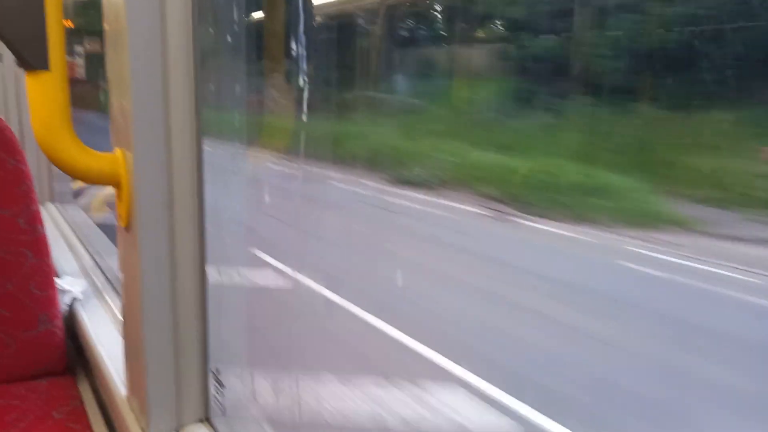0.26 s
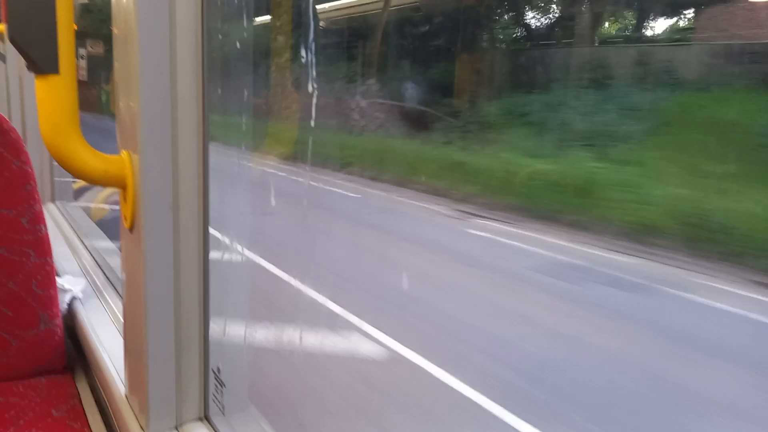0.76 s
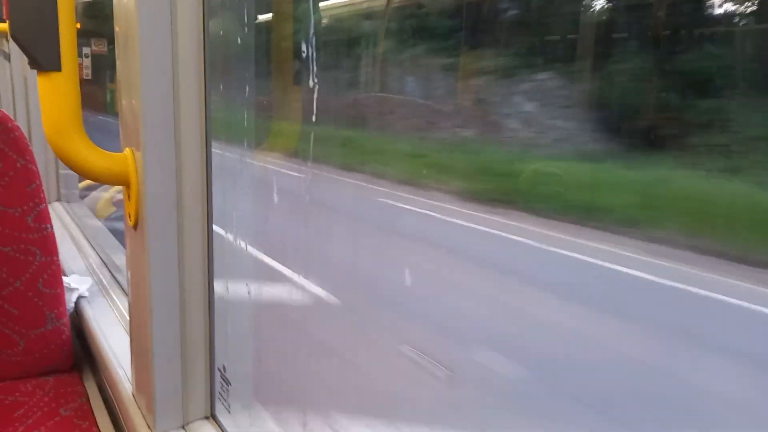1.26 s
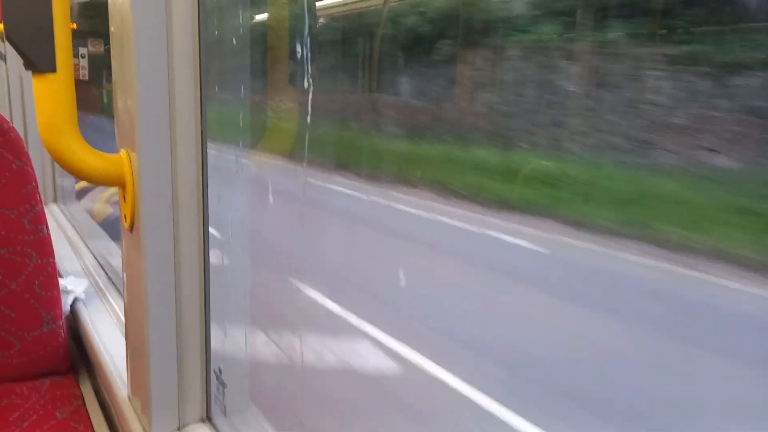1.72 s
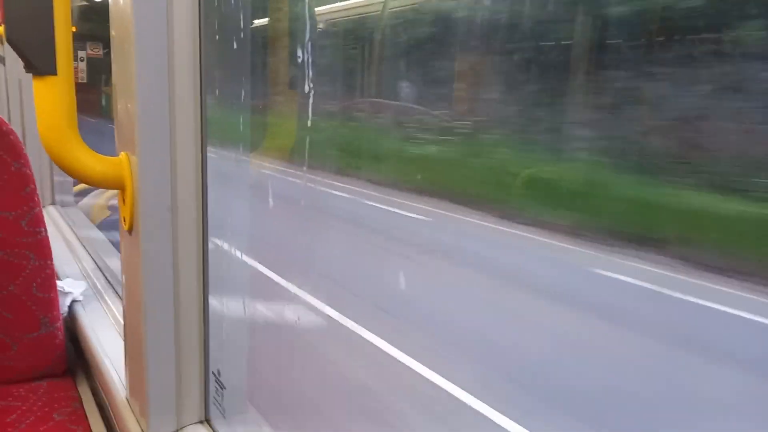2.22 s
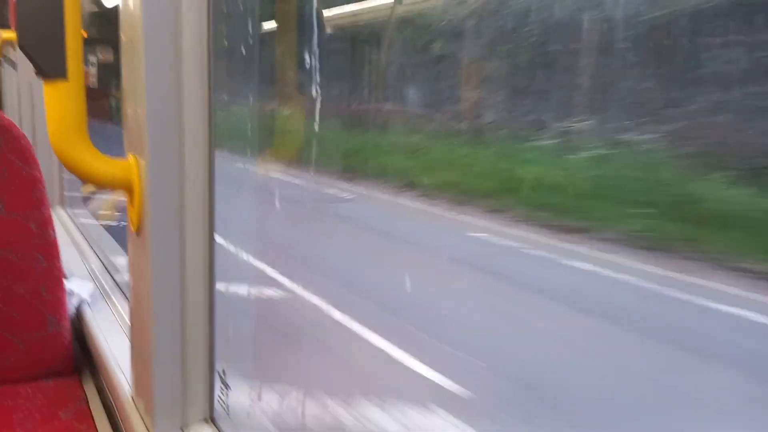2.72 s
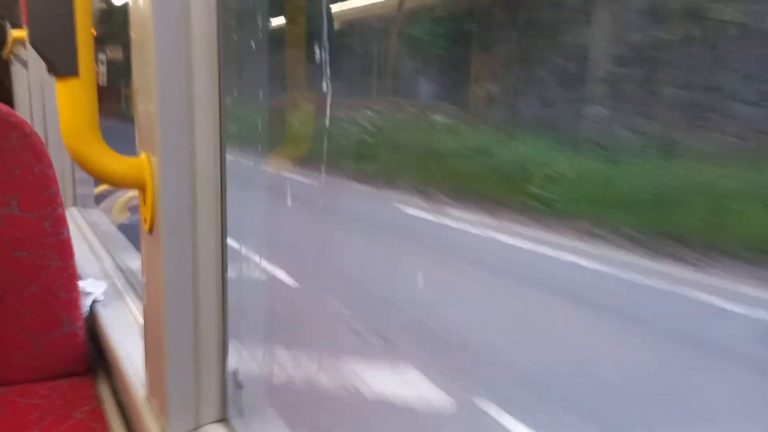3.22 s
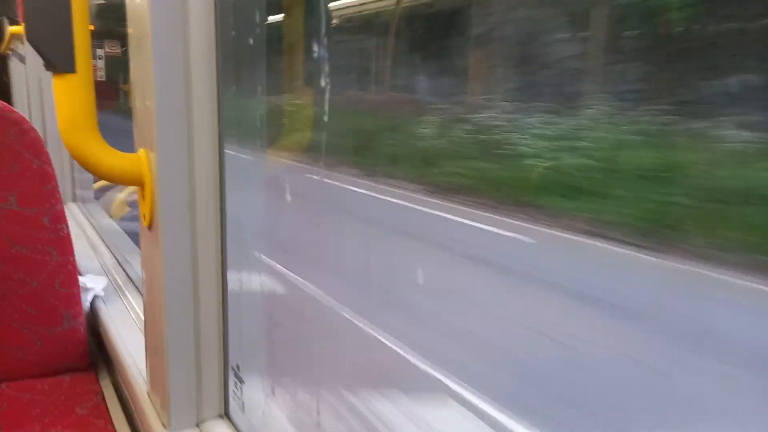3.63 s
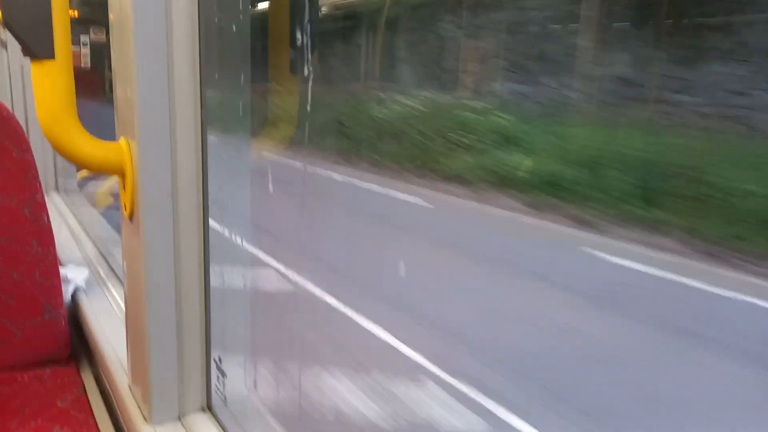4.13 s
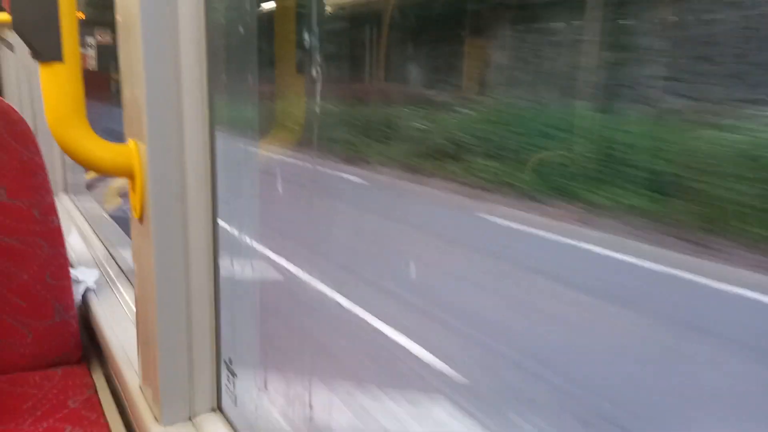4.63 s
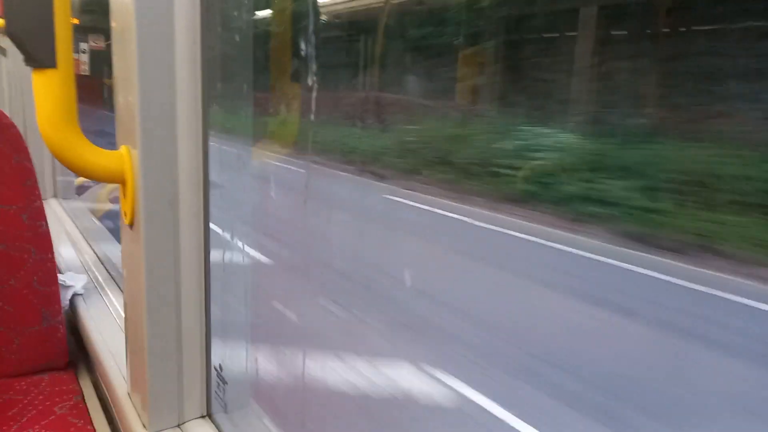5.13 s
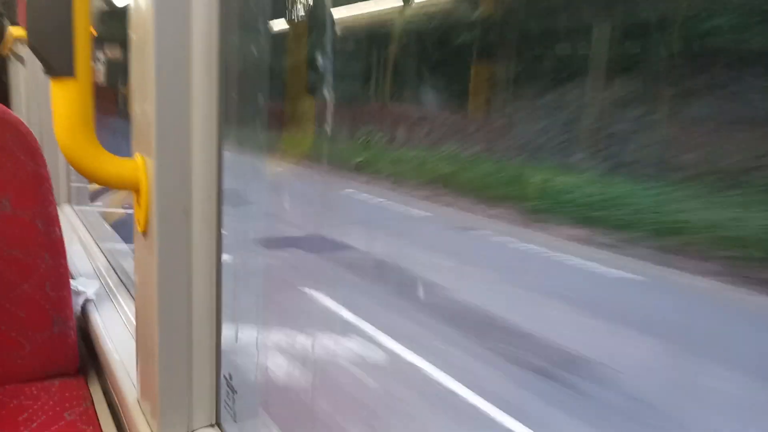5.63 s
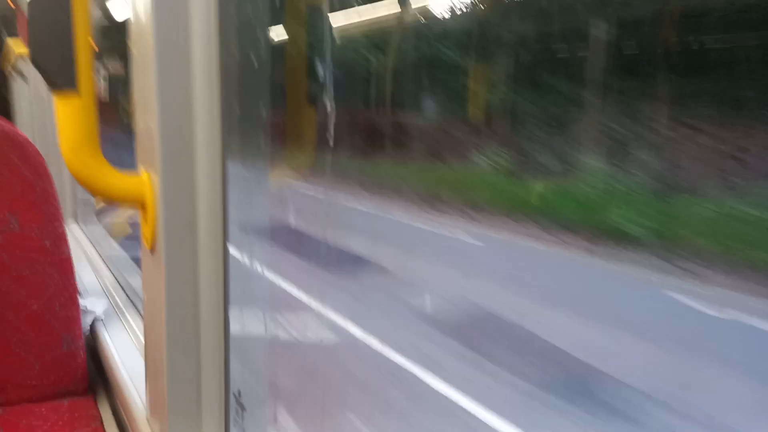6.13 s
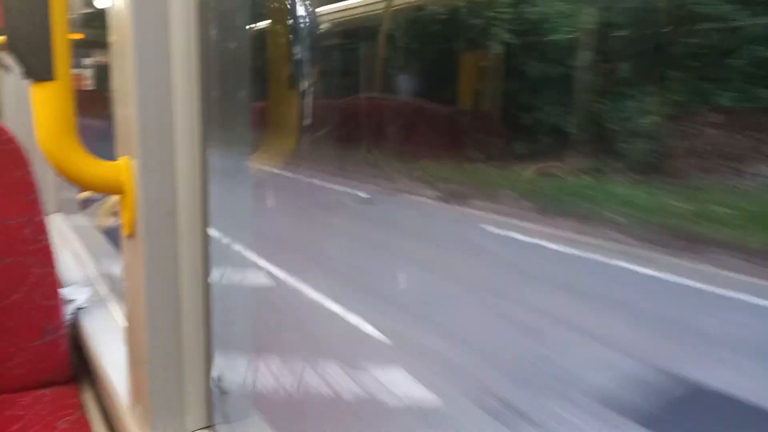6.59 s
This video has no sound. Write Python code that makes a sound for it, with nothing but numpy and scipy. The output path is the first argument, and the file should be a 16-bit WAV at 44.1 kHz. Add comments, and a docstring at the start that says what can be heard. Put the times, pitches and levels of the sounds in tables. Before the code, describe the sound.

A diesel bus is heard from a window seat inside, with deep road rumble, tyre roar and a booming engine drone throughout. Window and seat trim chatters lightly with each jolt, along with faint squeaks and a thin whine. Over the first two seconds the engine rises gently in pitch, trailed by a very faint high turbo whistle. A sharper knock comes at about 2.1 seconds. The engine then cruises steadily until about 5 seconds, while small clicks and knocks from loose fittings grow more frequent from 3.5 seconds. Between 5 and 5.7 seconds it changes up, dropping to low revs, and the whistle dies away. Two low bumps boom through the floor at about 5.7 and 6 seconds. The tyres swish briefly over patched asphalt from around 5.9 to 6.5 seconds, and the bus rumbles on with its panels humming until nearly 7 seconds.

```python
"""A window seat in a diesel bus on a country road. From the start the road rumbles through the body,
the tyres roar, and every jolt sets the trim chattering, among stray knocks and squeaks. Over two
seconds the four-cylinder engine pulls up, its turbo whistle trailing behind, then cruises, booming
in the cabin's air resonances. After five seconds it changes up to low revs and the turbo dies away;
last, bumps boom through the floor and the tyres swish over patched asphalt."""
import sys
import numpy as np
from scipy import signal
from scipy.fft import rfft, irfft
from scipy.io import wavfile
from scipy.ndimage import uniform_filter1d, minimum_filter1d

SR = 44100
rng = np.random.default_rng(int(sys.argv[2]) if len(sys.argv) > 2 else 0)


def put_to_file(sound):
    """Save the sound as 16-bit audio at rate SR, in the file named by the first command-line argument."""
    columns = np.atleast_2d(sound).T  # one column per channel
    safe = np.clip(columns, -1, 1)
    whole_steps = np.round(safe * 32767)
    wavfile.write(sys.argv[1], SR, whole_steps.astype(np.int16))


N = 302526
TIME = np.arange(N) / SR
BIN_HZ = np.fft.rfftfreq(N, 1 / SR)

# stereo image of the cabin: (frequency [Hz], left-right correlation [-1 to 1])
EAR_CORRELATION = [(60, 0.98), (210, 0.98), (350, 0.92), (500, 0.12), (770, 0.096), (1170, -0.31),
                   (1800, 0.088), (16000, -0.14)]
# lean of that image: (frequency [Hz], left minus right [dB])
EAR_BALANCE = [(50, -.5), (85, 1.5), (140, 0), (300, -2), (600, -4), (1100, -1.5), (2150, 7), (2950, 0),
               (4500, 0), (8000, -1), (16000, -3)]

# tone colours of the noise beds: (frequency [Hz], relative level [dB])
TRIM_SPECTRUM = [(1500, -22), (3000, -5), (4700, 6), (5450, 3), (5900, -8.5), (7300, 3.5), (8700, -6.5),
                 (12000, -6), (16000, -13.5)]
GRIT_SPECTRUM = [(500, -13), (1000, 3.5), (1400, -2), (2000, -4), (2600, -1.5), (3300, -2), (4200, -8),
                 (6500, -11), (9000, -23), (16000, -36.5)]
TYRE_SPECTRUM = [(250, -14.5), (470, -1.5), (550, 1.5), (720, -1), (1000, -2), (1400, -6), (1900, -13),
                 (2350, -15), (2700, -18), (3600, -22), (5300, -27.5), (7400, -33.5), (8700, -47.5),
                 (16000, -57)]
DRONE_SPECTRUM = [(100, -33), (180, -12), (215, -2), (245, 4.5), (285, -5), (322, 0), (350, -7),
                  (375, -11.5), (420, -13.5), (470, -28.5), (800, -62)]
FLOOR_SPECTRUM = [(20, -34), (40, -24), (52, -16.5), (64, 0), (76, 2), (100, -0.5), (135, 0.5), (165, -0.5),
                  (200, -10), (300, -33), (600, -71)]

# resonances: (frequency [Hz], width [Hz], lift [dB])
METAL_MODES = [(3600, 110, 8), (4700, 90, 2.5), (5250, 79, 1.5), (6230, 170, 8), (6900, 130, 5.5),
               (9300, 120, 5)]  # thin metal trim
WHEEL_ARCH_MODES = [(1900, 110, 7), (2160, 80, 3), (3230, 34, 6.5)]
HOLLOW_MODES = [(544.4, 24, 4), (685, 130, 2.5), (1830, 260, 3), (2284, 200, 3.5), (3595, 110, 4.5),
                (5480, 78, 4)]  # the hollow of the cabin
PANEL_MODES = [(95, 11, 7.5), (116.2, 15, 6), (170.8, 15, 4.5), (245.5, 17.3, 9.5), (331, 8, 4.5)]  # cabin air and side panels, swept by the engine orders
AIR_MODES = [(58.7, 11, 14.5), (75.4, 4, 12.5), (100, 2.6, 19.5), (126.3, 7.8, 14)]  # air along the cabin, swept by the firing note and its octave

# trim rubs: (midpoint [s], length [s], pitch [Hz], level [dB], octave above tone [dB])
TRIM_SQUEAKS = [(.33, .17, 5500, -59, -22), (.442, .14, 4980, -55, -14), (.58, .2, 5240, -49, -13),
                (.87, .22, 5270, -51.5, -10), (2.22, .3, 5426, -55, -19), (2.8, .14, 5446, -56, -22),
                (3.98, .17, 4690, -57, -5), (4.419, .2, 4930, -57, -8), (4.89, .14, 5126, -55, -6),
                (5.139, .07, 4678, -59, 3)]
# loose fittings knock: (time [s], level [dB], ring [Hz], share of dry crack [0-1])
FITTING_KNOCKS = [(.495, -38.5, 5170, 0.07), (2.119, -44, 5450, .1), (2.131, -21.5, 650.5, 0.04),
                  (3.152, -47, 4900, 0.4), (3.538, -35, 4300, 0.5), (3.542, -34.5, 1100, 0.06),
                  (3.580, -49, 6230, 0.2), (3.924, -41, 4400, 0.32), (4.0382, -29.5, 3805, 0.7),
                  (4.557, -37, 6600, 0.4), (4.754, -34.5, 6890, 0.5), (5.384, -39, 7020, .5),
                  (5.597, -34, 4300, .6), (5.696, -42, 9500, .7), (5.763, -37, 6800, .4),
                  (5.955, -32, 3280, .02), (6.205, -42, 4640, .15), (6.388, -37, 6850, 0.46),
                  (6.67, -38, 4765, 0.5)]
# uneven road jolts the body: (peak time [s], strength [0-1])
ROAD_JOLTS = [(.15, 0.55), (.46, 0.66), (.83, 0.35), (1.2, 0.06), (1.31, 0.2), (1.77, 0.5), (2.3, 0.3),
              (2.78, 0.4), (3.06, 0.6), (3.15, 0.5), (3.56, 0.8), (3.94, 0.8), (4.33, 0.61), (4.55, 0.3),
              (4.76, .6), (4.94, 0.5), (5.4, .65), (5.61, 0.64), (5.79, .6), (6.23, 0.4), (6.31, 0.28),
              (6.4, 1), (6.49, 0.56)]
# coarseness of the asphalt: (time [s], tyre roar lift [dB])
COARSENESS = [(0, 0.7), (1.1, 0.5), (1.6, 0.1), (4.0, 0.2), (4.35, 1.25), (5.1, 0), (5.85, 4.5), (6.07, 3),
              (6.27, 5.5), (6.5, 2), (6.7, 0), (6.86, 1)]
# the tyres cross asphalt patches: (peak time [s], level [dB], rise [s], fall [s])
ASPHALT_PATCHES = [(5.88, -33.5, 0.061, 0.06), (5.962, -32.5, 0.031, 0.078), (6.25, -37, 0.056, 0.074),
                   (6.44, -41, .06, 0.08)]
# a side panel hums up: (peak time [s], level [dB], pitch [Hz], half length [s])
PANEL_HUMS = [(.87, -22.5, 252, .38), (5.277, -22, 324.2, 0.22), (6.707, -21.5, 314, .25)]
# the side panels' drone: (time [s], level [dB])
DRONE_LEVEL = [(0, -19), (.8, -20.5), (1.6, -25), (3.5, -23.5), (4.2, -22), (4.9, -23), (5.6, -20.5),
               (6.2, -18), (6.86, -20)]
# the wheels hit bumps: (time [s], level [dB], pitch [Hz], rise [s])
WHEEL_BUMPS = [(0.47, -14, 101.2, 0.047), (4.311, -13.5, 79.2, 0.062), (5.51, -19, 97, 0.021),
               (5.66, -6, 82.84, 0.043), (6.018, -9.5, 80, 0.036)]

# the engine pulls up, cruises and changes up a gear: (time [s], firing rate [Hz])
FIRING_RATE = [(0, 50.73), (.25, 51.08), (.8, 56.16), (1.12, 57.14), (1.45, 60.23), (1.7, 63.03),
               (2.0, 61.9), (2.4, 63.34), (3.5, 63.02), (5.0, 63.53), (5.3, 60.5), (5.5, 56.7),
               (5.68, 41.6), (6.1, 39.43), (6.4, 35.98), (6.86, 37.57)]
# how hard it pulls, easing off for the gear change: (time [s], load [dB])
ENGINE_LOAD = [(0, 1), (.6, 0), (1.8, 0.5), (2.5, -1.5), (4.9, -3), (5.3, 0.5), (5.58, -6.5), (5.85, -0.5),
               (6.86, 1.5)]
# throb of uneven cylinders: (order [multiple of the cycle rate], relative level [dB])
THROB_ORDERS = [(5, -24), (6, -9.5), (7, -4.5), (9, -4.5), (10, -12.5), (11, -2.5), (12, -11), (13, -8),
                (14, -13), (15, -12), (16, -24.5), (17, -13), (18, -11), (19, -31), (20, -20), (21, -12),
                (22, -8.5), (23, -27), (24, -17.5), (25, -31.5), (26, -20.5), (27, -25.5)]


def gain_of(db):
    """Decibels to amplitude."""
    return 10 ** (np.asarray(db) / 20)


def unit_rms(x):
    """Scales to rms 1."""
    return x / np.sqrt(np.mean(x ** 2) + 1e-20)


def curve(points):
    """An automation curve through (time, value) points."""
    return np.interp(TIME, *np.transpose(points))


def eq_curve(points):
    """A curve through (frequency, value) points, on a log-frequency axis."""
    hz, value = np.transpose(points)
    return np.interp(np.log(BIN_HZ + 1), np.log(hz + 1), value)


def lift(modes, hz):
    """The dB that a set of resonances adds at each frequency."""
    return sum(db / (1 + (2 * (hz - centre) / width) ** 2) for centre, width, db in modes)


def panned(db):
    """Stereo gains for a left-minus-right level."""
    return gain_of(np.array([[db], [-db]]) / 2)


def add(mix, s, sound):
    """Mixes a sound in at time s."""
    part = mix[:, round(s * SR):][:, :sound.shape[1]]
    part += sound[:, :part.shape[1]]


def swell(s, rise_s, fall_s):
    """A rounded hump of height 1 at time s."""
    return np.exp(-((TIME - s) / np.where(TIME < s, rise_s, fall_s)) ** 2)


def noise():
    """Two channels of white noise."""
    return rng.standard_normal((2, N))


def wander(hz):
    """Random drift of rms 1, up to the given rate."""
    coarse = TIME[::32]
    rates = np.fft.rfftfreq(len(coarse), coarse[1])
    spectrum = rfft(rng.standard_normal(len(coarse))) / (1 + (rates / hz) ** 4)
    return np.interp(TIME, coarse, unit_rms(irfft(spectrum, len(coarse))))


def fuzzy_tone(hz, width_hz):
    """A narrow band of noise, rms 1, that follows a pitch."""
    phase = 2 * np.pi * np.cumsum(hz * np.ones(N)) / SR
    return wander(width_hz) * np.cos(phase) + wander(width_hz) * np.sin(phase)


def burst(t60):
    """A dying puff of stereo noise."""
    t = TIME[:8192]
    return rng.standard_normal((2, len(t))) * gain_of(-60 * t / t60)


def contacts(per_s, spread_db, t60):
    """A grainy texture of tiny impacts of uneven size, each dying quickly."""
    hits = rng.random(N) < per_s / SR
    taps = hits * gain_of(spread_db * np.minimum(rng.exponential(1, N), 3))
    decay = gain_of(-60 * TIME[:4096] / t60)
    power = signal.oaconvolve(taps ** 2, decay ** 2)[:N]
    return noise() * np.sqrt(np.maximum(power, 0))


def cabin(drive, spectrum, modes=(), ripple_db=2.7, ripple_hz=28):
    """Colours a texture, at rms 1; bass reaches both ears alike, treble comes from all around."""
    left, other = rfft(drive)
    alike = eq_curve(EAR_CORRELATION)
    right = alike * left + np.sqrt(1 - alike ** 2) * other
    # reflections from the glass leave a fine, steady ripple above the bass
    ripple = np.interp(BIN_HZ / ripple_hz, np.arange(4096), rng.uniform(-1, 1, 4096)) * (BIN_HZ > 800)
    colour_db = eq_curve(spectrum) + lift(modes, BIN_HZ) + ripple_db * ripple
    side_db = np.outer([1, -1], eq_curve(EAR_BALANCE)) / 2
    return unit_rms(irfft(np.array([left, right]) * gain_of(colour_db + side_db), N))


def jolting(rise_s=.021, fall_s=.09):
    """How hard the road shakes floor, tyres and trim together: 0 at rest to about 1."""
    return sum(strength * swell(s, rise_s, fall_s) for s, strength in ROAD_JOLTS)


def whine(hz=1015, width_hz=10, start_db=-42, end_db=-47):
    """A thin wavering whine, as of axle gears, reaching the ears in opposite phase."""
    level = gain_of(np.linspace(start_db, end_db, N))
    return level * fuzzy_tone(hz, width_hz) * np.array([[1], [-.8]])


def turbo(base_hz=13750, base_firing_hz=50.5, hz_per_hz=235, lag_s=.08, width_hz=200, level_db=-62):
    """An airy, very high whistle that trails the revs and grows with the load."""
    inertia = np.exp(-1 / (lag_s * SR))
    rise_hz = signal.lfilter([1 - inertia], [1, -inertia], curve(FIRING_RATE) - base_firing_hz)
    hz = base_hz + hz_per_hz * rise_hz
    boost = np.interp(base_firing_hz + rise_hz, [45, 52], [0, 1])  # off boost at low revs
    whistle = np.array([fuzzy_tone(hz, width_hz), fuzzy_tone(hz, width_hz)])
    return gain_of(level_db + .8 * curve(ENGINE_LOAD)) * boost * whistle


def squeaks(waver=.01, scratch_hz=120):
    """Scratchy stick-slip in the trim: a wavering tone and its octave, chopped by the changing grip."""
    out = np.zeros((2, N))
    bend = wander(40)
    grip = np.array([wander(scratch_hz), wander(scratch_hz)])
    for s, length, hz, db, octave_db in TRIM_SQUEAKS:
        span = abs(TIME - s) < length / 2
        phase = 2 * np.pi * np.cumsum(hz * (1 + waver * bend[span])) / SR
        tone = np.sin(phase) + gain_of(octave_db) * np.sin(2 * phase)
        out[:, span] += gain_of(db) * tone * signal.windows.tukey(len(tone), .5) * grip[:, span]
    return out


def knocks(ring_t60=.11, snap=2.6, snap_t60=.0045, relative_width=.35):
    """Each loose fitting snaps, then rings in one broad resonance over a dry crack."""
    out = np.zeros((2, N))
    for s, db, hz, dryness in FITTING_KNOCKS:
        crack = burst(ring_t60 * (1 - dryness)) + snap * burst(snap_t60)  # drier is shorter
        edges_hz = hz * np.exp([-relative_width / 2, relative_width / 2])
        band = signal.butter(2, edges_hz, "band", fs=SR)
        makeup = np.sqrt(SR / 2 / (relative_width * hz))
        ring = makeup * signal.lfilter(*band, crack)
        add(out, s, gain_of(db) * ((1 - dryness) * ring + dryness * crack))
    return out


def trim_chatter(jolt, level_db=-55.5, jolt_db=9, per_coarseness=2.07, clump_db=2):
    """Window frames and seat trim chatter in clumps of tiny contacts, louder on jolts and coarse road."""
    clumps = contacts(per_s=470, spread_db=-1, t60=.032) * gain_of(clump_db * np.tanh(wander(15)))
    level = gain_of(level_db + jolt_db * jolt + per_coarseness * curve(COARSENESS))
    return level * cabin(clumps, TRIM_SPECTRUM, METAL_MODES)


def tyre_swish(steady_db=-50):
    """Grit hisses faintly under the tyres, swelling on each patch of asphalt."""
    patches = sum(gain_of(db) * swell(s, rise, fall) for s, db, rise, fall in ASPHALT_PATCHES)
    grit = cabin(contacts(per_s=770, spread_db=1, t60=.018), GRIT_SPECTRUM, WHEEL_ARCH_MODES)
    return (gain_of(steady_db) + patches) * grit


def tyre_roar(cycle, jolt, level_db=-31, jolt_db=2.5, flutter_db=1.3, pulse_depth=.071):
    """The roar rides on coarse road and jolts, pulsing faintly with the engine cycle."""
    pulsing = 1 + pulse_depth * np.cos(cycle)
    level = gain_of(level_db + curve(COARSENESS) + jolt_db * jolt + flutter_db * np.tanh(wander(22)))
    return level * pulsing * cabin(noise(), TYRE_SPECTRUM, HOLLOW_MODES)


def panel_hums(width_hz=7):
    """Each hum blooms and fades in one narrow panel resonance."""
    return panned(-2) * sum(gain_of(db) * swell(s, half, half) * fuzzy_tone(hz, width_hz)
                            for s, db, hz, half in PANEL_HUMS)


def floor_bumps():
    """Each bump swells and dies in one low resonance of the floor."""
    out = np.zeros((2, N))
    t = TIME[:SR]
    for s, db, hz, rise in WHEEL_BUMPS:
        envelope = (t / rise * np.exp(1 - t / rise)) ** 2
        tone = np.sqrt(2) * np.sin(2 * np.pi * hz * t)
        add(out, s, gain_of(db) * envelope * tone[None])
    return out


def body_rumble(jolt, level_db=-18, jolt_db=2, per_coarseness=.33, drone_lift_db=.5):
    """The road shakes the floor, harder at each jolt, and sets the side panels droning."""
    floor_db = level_db + jolt_db * jolt + per_coarseness * curve(COARSENESS)
    floor = gain_of(floor_db) * cabin(noise(), FLOOR_SPECTRUM)
    drone = gain_of(curve(DRONE_LEVEL) + drone_lift_db) * cabin(noise(), DRONE_SPECTRUM)
    return floor + drone


def engine_cycle(jitter=.00099):
    """Phase of the four-stroke cycle: four firings each time round, slightly unsteady."""
    firing_hz = curve(FIRING_RATE) * (1 + jitter * wander(13))
    return 2 * np.pi * np.cumsum(firing_hz) / SR / 4


def engine(cycle, note_db=-30.5, octave_db=-28, throb_db=-21, smear=.3, scatter=.77):
    """The firing note and its octave boom in the cabin's resonances; one stronger cylinder throbs."""
    def partial(order, flutter):
        """One order; the body smears each kick, more so the farther the order lies from the octave."""
        lag = smear * (order - 8) ** 2 + scatter * rng.standard_normal()
        return np.sqrt(2) * (1 + flutter * wander(4.3)) * np.cos(order * cycle - lag)

    firing_hz = curve(FIRING_RATE)
    low_cut_db = 67 * np.minimum(np.log2(firing_hz / 50), 0)  # 67 dB an octave below 50 Hz
    note = gain_of(note_db + lift(AIR_MODES, firing_hz) + low_cut_db) * partial(4, flutter=.056)
    octave = gain_of(octave_db + lift(AIR_MODES, 2 * firing_hz)) * partial(8, flutter=.056)
    throb = sum(gain_of(db + lift(PANEL_MODES, order * firing_hz / 4)) * partial(order, flutter=.1)
                for order, db in THROB_ORDERS)
    lugging_db = np.interp(firing_hz, [42, 50], [-3, 0])  # the throb softens at low revs
    throb *= gain_of(throb_db + curve(ENGINE_LOAD) + lugging_db)
    return note + (octave + throb) * panned(-2)


def scene():
    """The mix at the seat: road bed, drivetrain and rattles."""
    cycle, jolt = engine_cycle(), jolting()
    road = body_rumble(jolt) + panel_hums() + floor_bumps() + tyre_roar(cycle, jolt) + tyre_swish()
    drivetrain = engine(cycle) + turbo() + whine()
    rattles = trim_chatter(jolt) + knocks() + squeaks()
    return road + drivetrain + rattles


def record(dry):
    """A limiter holds peaks at full scale, the ends fade in milliseconds, and the top is rolled off."""
    peak_gain = np.minimum(1, 1 / (abs(dry).max(0) + 1e-9))
    limited = dry * uniform_filter1d(minimum_filter1d(peak_gain, size=600), size=600)
    faded = limited * signal.windows.tukey(N, .001)
    low_pass = signal.firwin(511, cutoff=15900, window=("kaiser", 9), fs=SR)
    return signal.oaconvolve(faded, low_pass[None], "same")


dry = scene()
out = record(dry)
put_to_file(out)
```